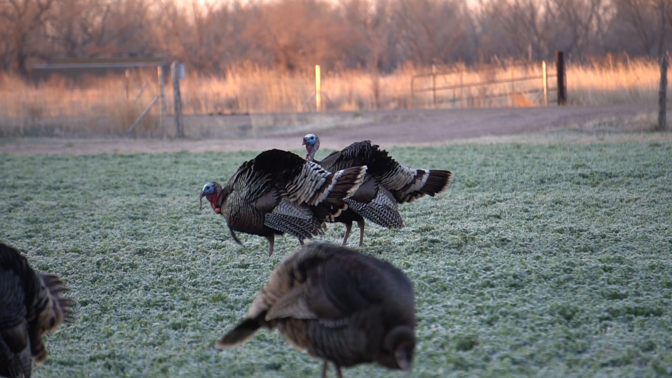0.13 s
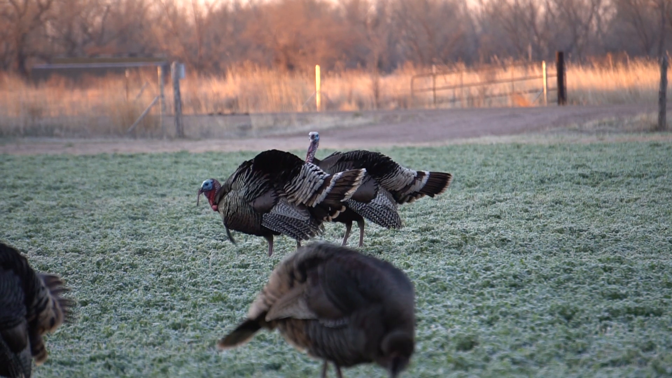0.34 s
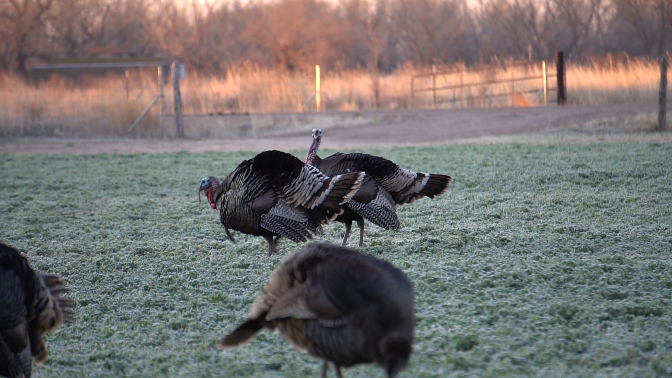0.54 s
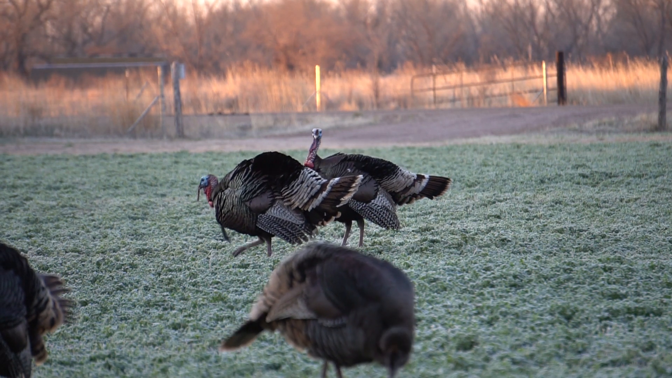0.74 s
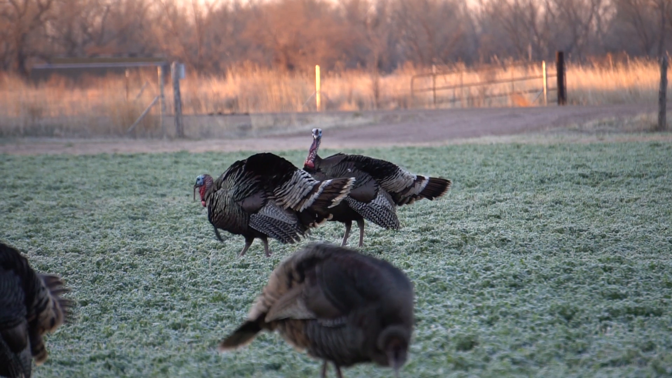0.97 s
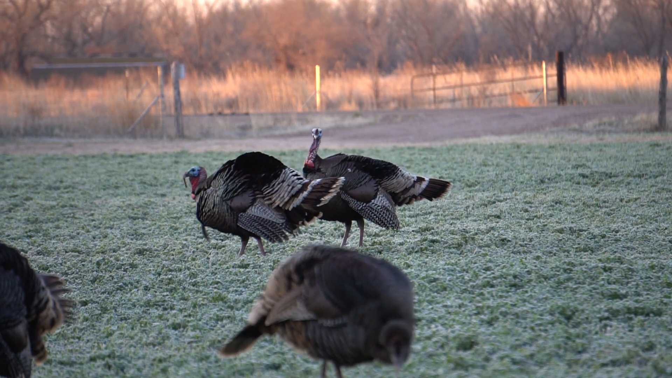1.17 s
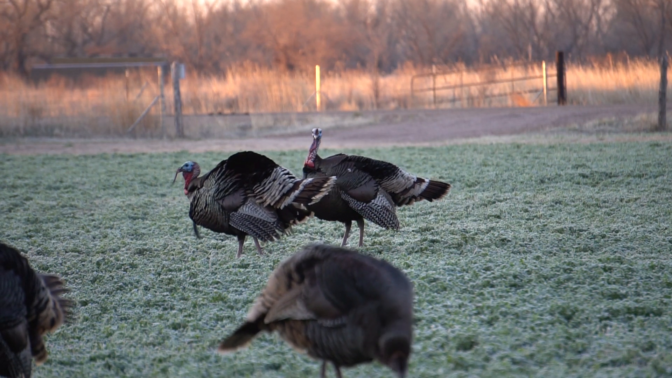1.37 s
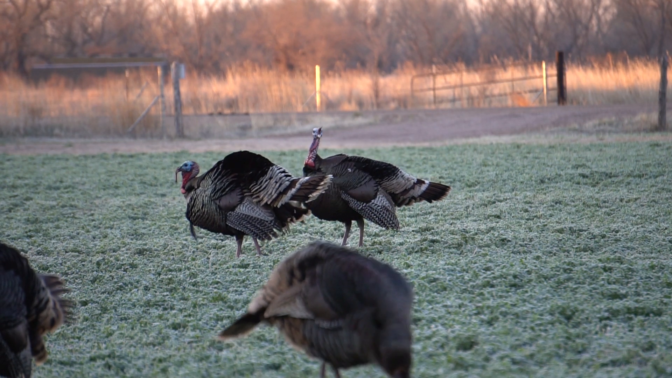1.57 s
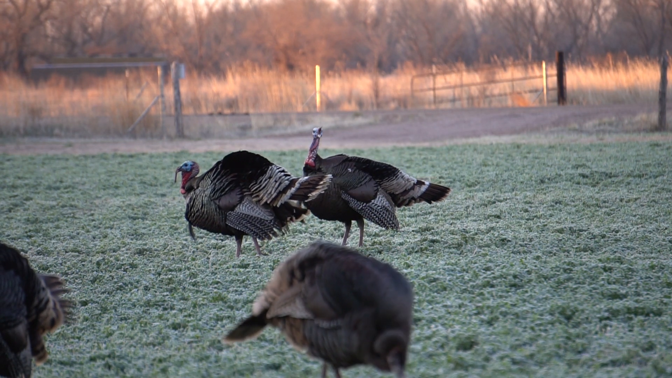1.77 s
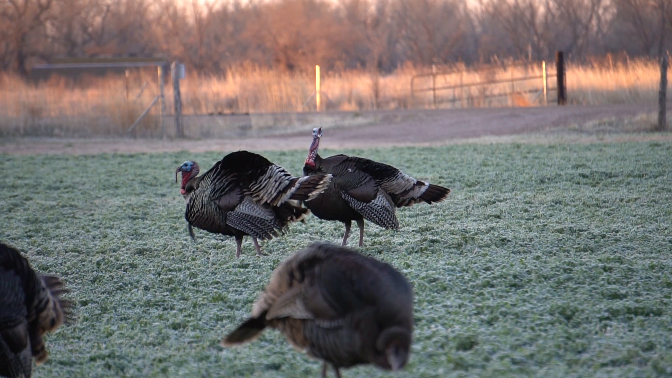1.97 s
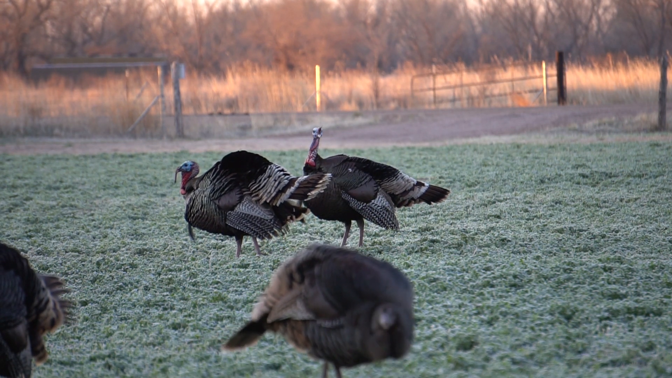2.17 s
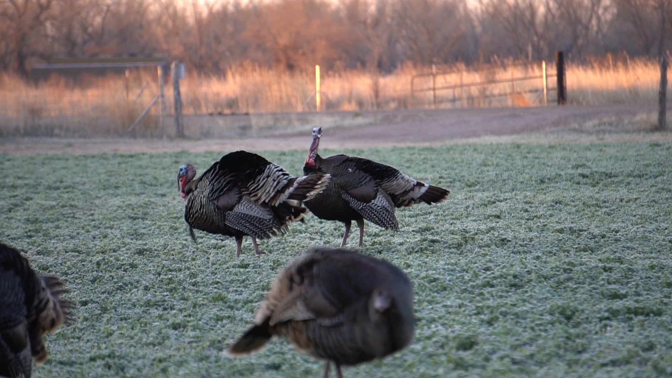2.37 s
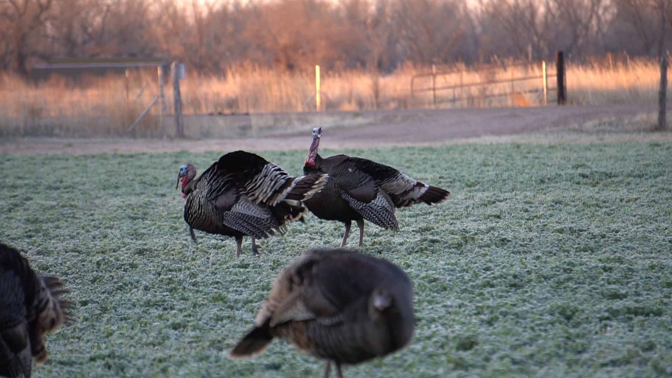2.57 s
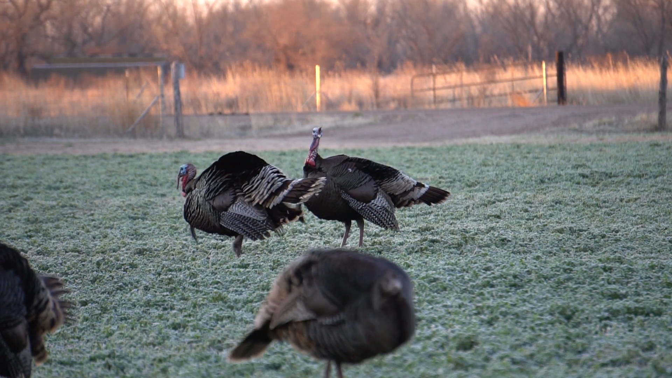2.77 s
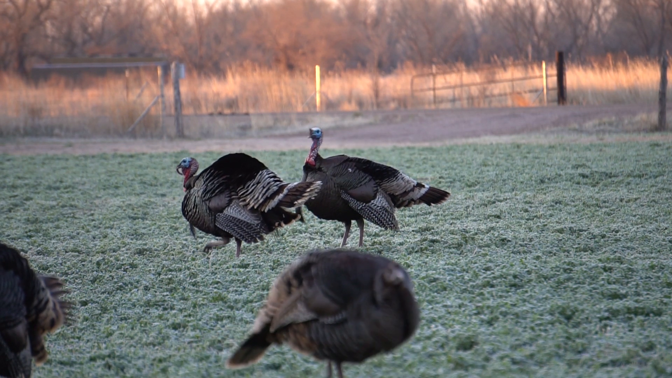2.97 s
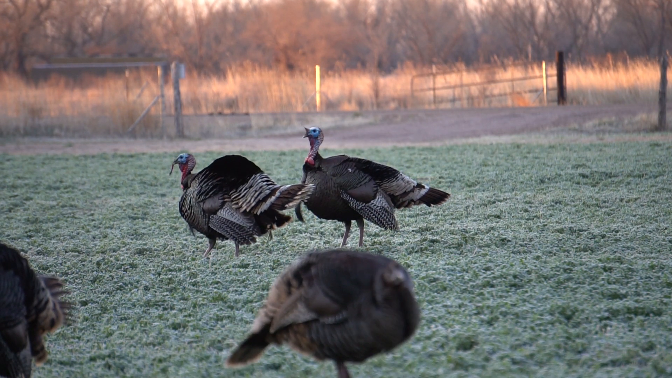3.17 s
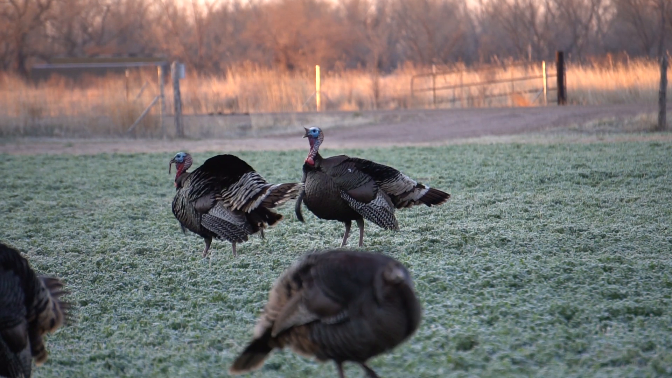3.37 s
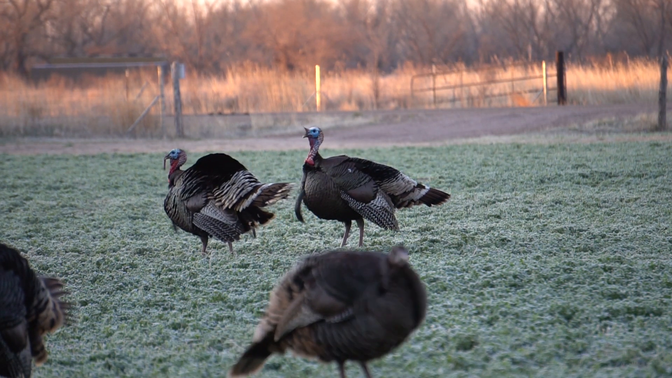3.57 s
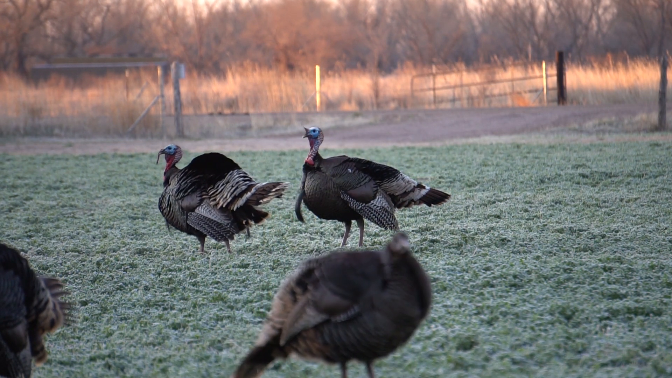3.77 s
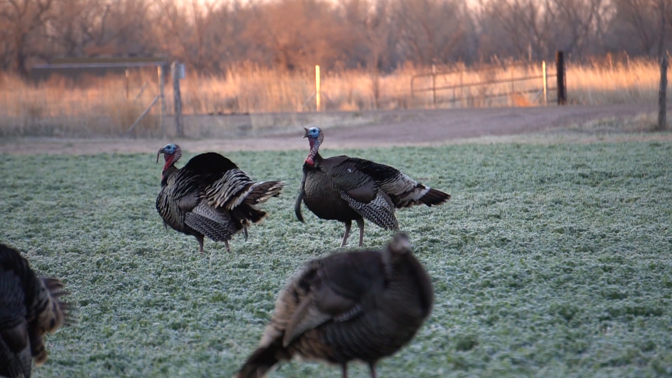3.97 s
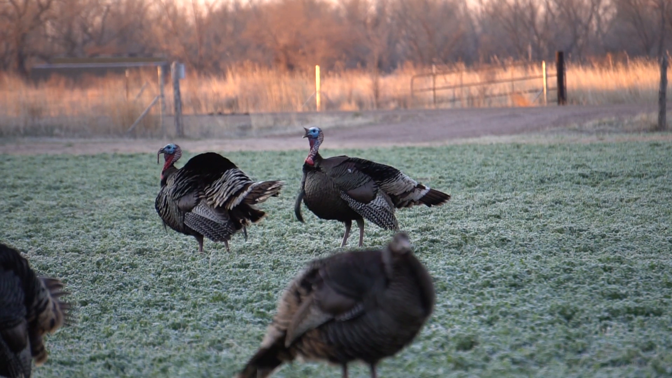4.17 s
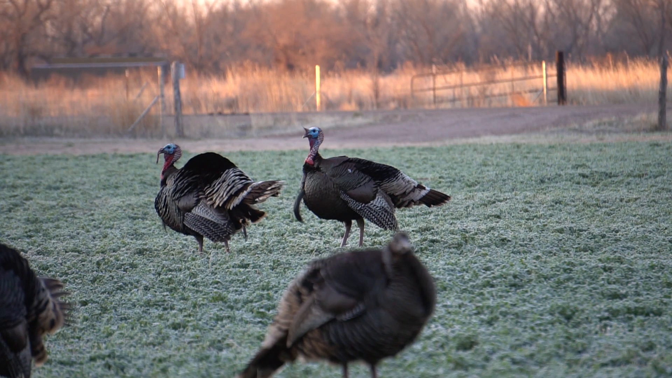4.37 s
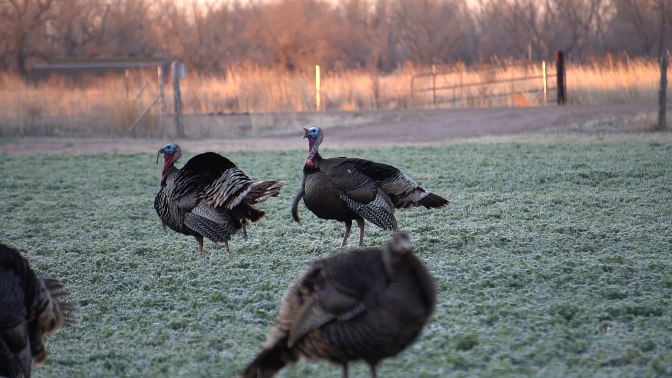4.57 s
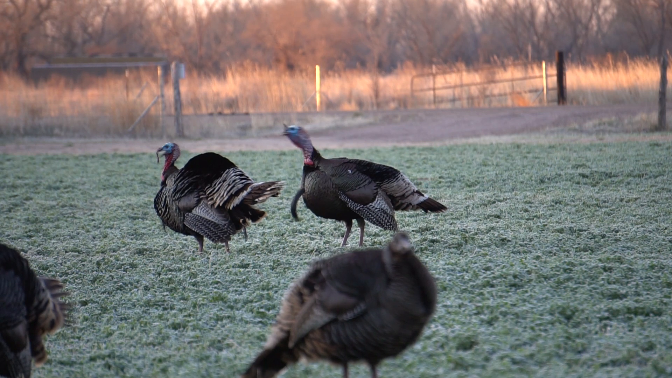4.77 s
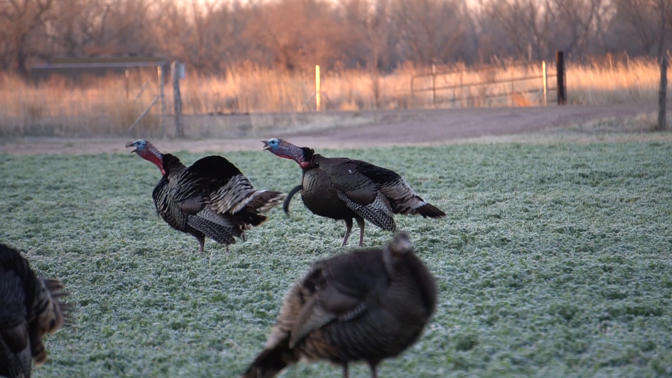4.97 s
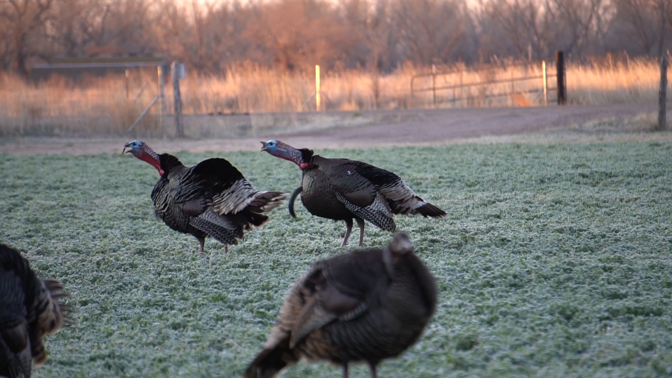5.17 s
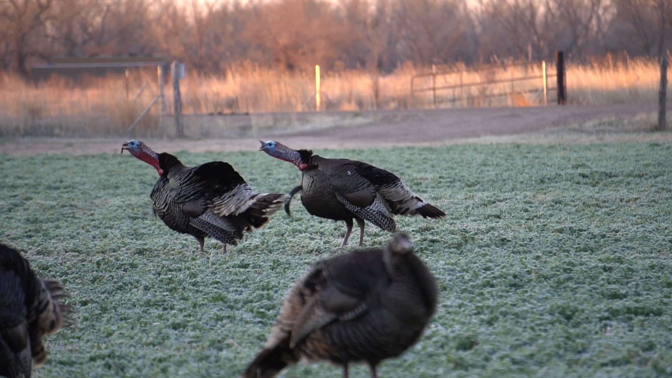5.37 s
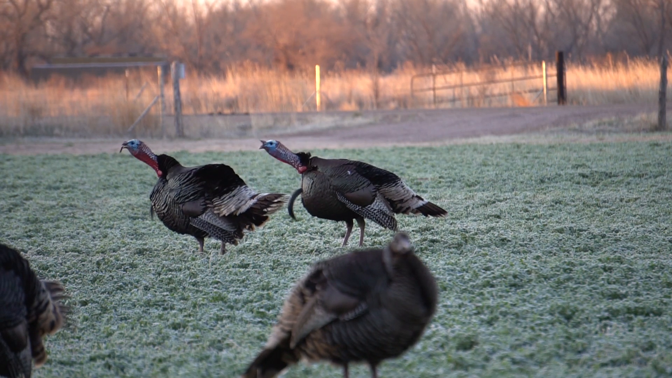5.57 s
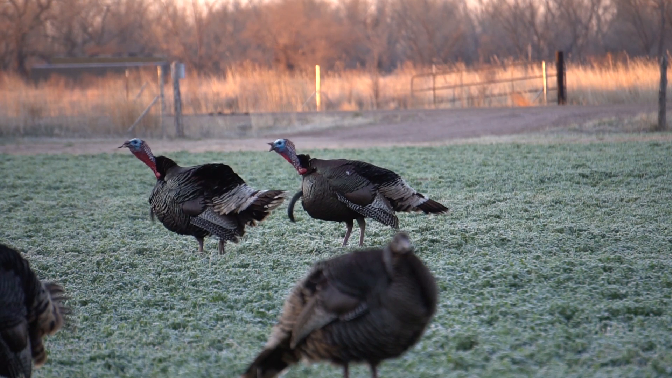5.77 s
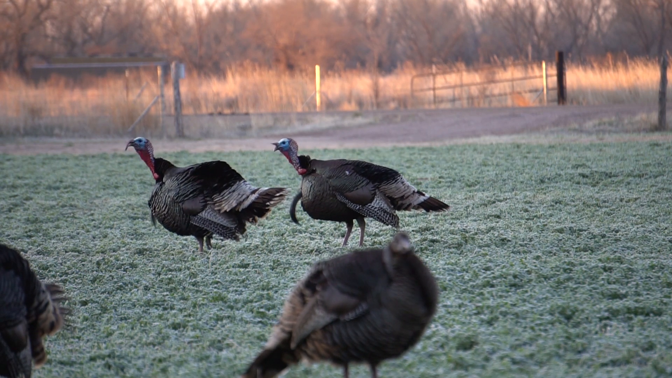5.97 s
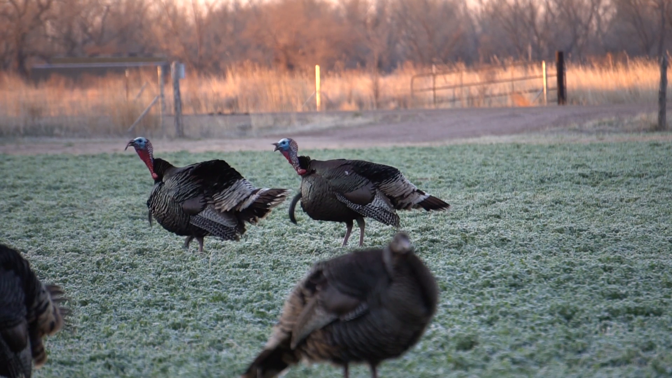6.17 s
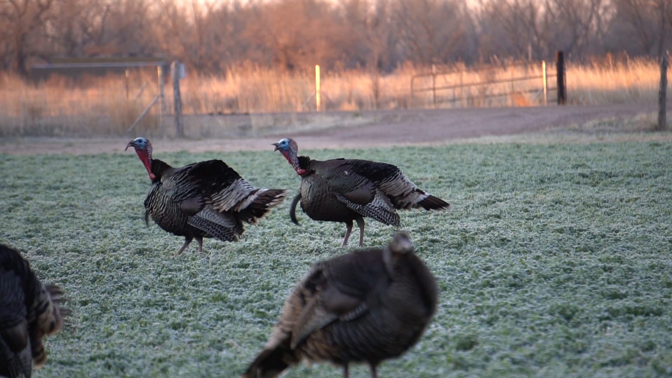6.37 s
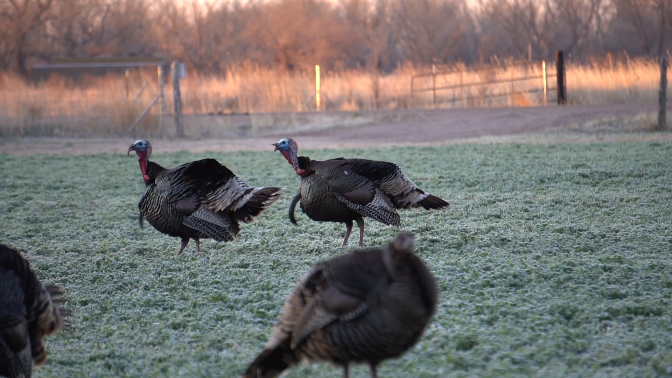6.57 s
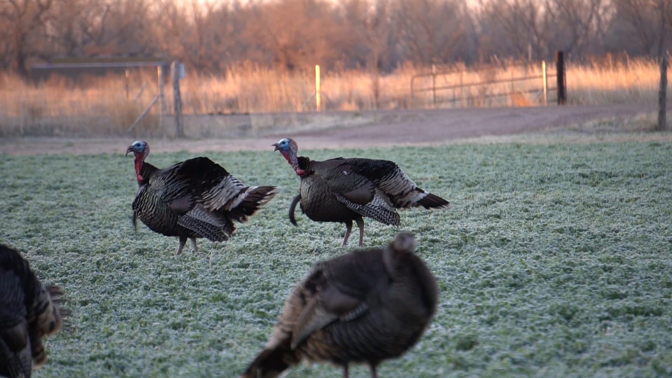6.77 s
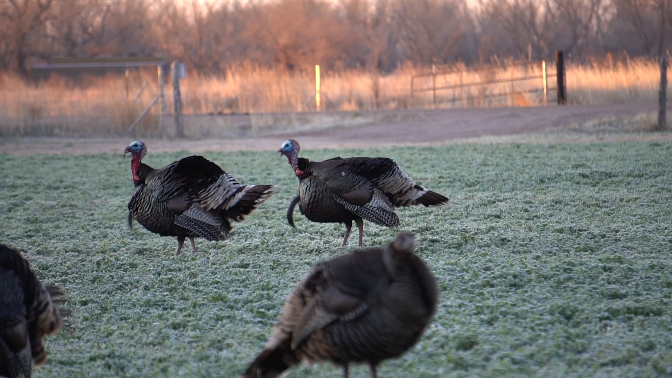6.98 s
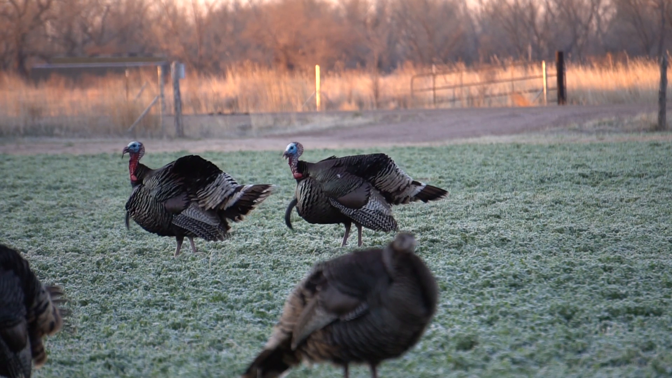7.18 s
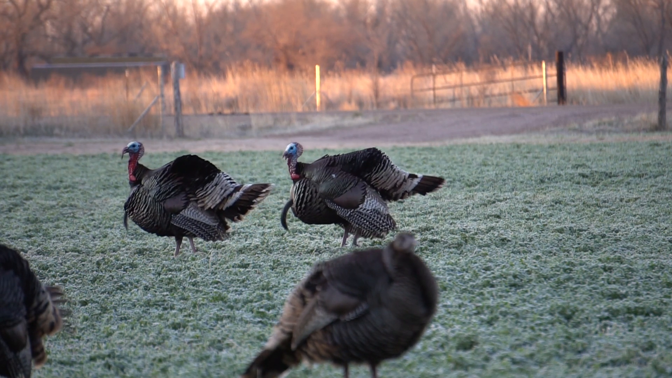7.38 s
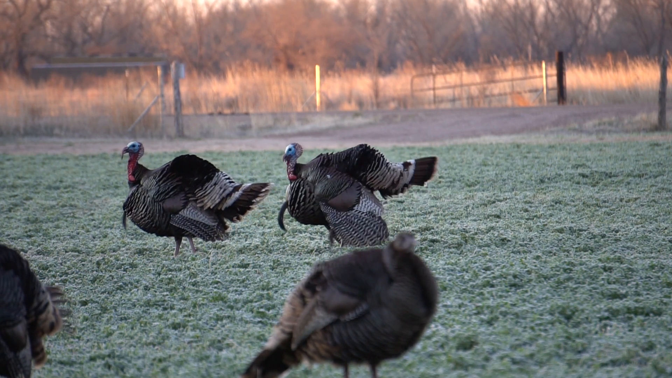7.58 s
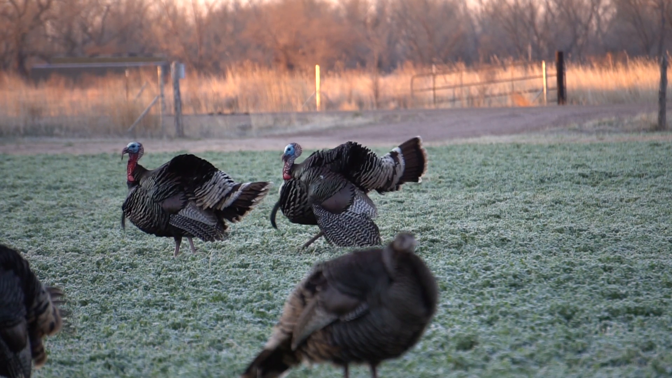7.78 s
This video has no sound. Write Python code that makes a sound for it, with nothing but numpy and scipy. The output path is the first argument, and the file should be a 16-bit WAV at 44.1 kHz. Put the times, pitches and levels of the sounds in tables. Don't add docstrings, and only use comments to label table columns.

```python
import sys
import numpy as np
from scipy import signal
from scipy.fft import rfft, irfft, next_fast_len
from scipy.io import wavfile
from scipy.ndimage import uniform_filter1d, map_coordinates

SR = 44100
rng = np.random.default_rng(int(sys.argv[2]) if len(sys.argv) > 2 else 0)


def file_out(sig):
    cols = np.atleast_2d(sig).T
    lim = np.clip(cols, -1, 1)
    pcm = np.round(lim * 32767).astype(np.int16)
    wavfile.write(sys.argv[1], SR, pcm)


def gain_from_decibels(decibels):
    exponent = np.asarray(decibels, float) / 20
    return 10 ** exponent


N = 344862
TIME = np.arange(N) / SR

# start_s, length_s, level_db, from_hz, to_hz
PURR = [(.437, 0.051, -6.5, 650.5, 669), (.49, .113, -8.5, 672, 645.4), (.606, 0.02857, -3, 633.6, 650),
        (.636, 0.052, -8.5, 689, 662), (.686, 0.023, -7, 660, 648), (.714, 0.028, -10.5, 651, 660),
        (.735, 0.056, -6, 642, 668), (.787, 0.082, -5.5, 672, 645), (.867, 0.038, -17, 693, 686),
        (.906, 0.051, -8, 667.5, 670), (.959, .028, -0.5, 663, 653), (.99, 0.0716, -6, 674.4, 668),
        (1.055, 0.081, -6, 672, 670), (1.12, 0.073, -7, 688.5, 677), (1.186, 0.029, -9, 627, 621)]
# start_s, length_s, level_db, from_hz, to_hz
CLUCKS = [
    (0.349, 0.059, -9.5, 634, 643.3),
    (1.934, 0.014, -10, 626, 617),
    (2.23, 0.018, -11.5, 631.5, 602.5),
    (2.252, 0.039, -5, 591, 598.4),
    (2.322, 0.052, -4, 616, 589.6),
    (6.81, .025, -18, 615, 672.2),
    (6.876, .068, -5, 663, 624),
    (6.955, .045, -7.5, 629.5, 623.2),
]
# start_s, length_s, level_db, from_hz, to_hz
YELPS = [
    (2.657, .09, -3, 608.5, 639.8),
    (2.978, .11, -2, 640.6, 665),
    (3.309, 0.1, -2, 661.7, 640),
    (3.635, 0.084, -2.5, 676.7, 624.7),
    (3.96, 0.092, -2.5, 704, 638),
    (4.312, .11, -3.5, 677.5, 629.4),
    (4.696, 0.0758, -3, 632.2, 599.7),
    (7.202, .075, -3, 643.7, 635),
    (7.506, .088, -2.5, 643.7, 628),
    (7.799, 0.11, -1.5, 650, 584.2),
]
# time_s, upper_partials_lift_db, hoarseness_db, third_partial_db
THROAT_STRAIN = [(.4, -11.5, -29, -9.5), (.6, -6.5, -25, -2.5), (.85, -6.5, -44, -4.5), (.89, -1.5, -6, -1),
                 (.93, -6.5, -27, -4), (1.04, -2.5, -28.5, -7), (1.09, -1, -12, -10),
                 (1.19, -4.5, -26, -13), (1.3, -2, -34, -9.5)]
# multiple, level_db
HEN_PARTIALS = [(1, -35.5), (4, -21), (5, -27.5), (6, -37.5), (7, -36), (8, -44), (9, -52), (10, -56.5),
                (11, -58.5)]
REST_HZ, LIFT_DB_PER_HZ, THIRD_DB_PER_HZ = 650, 0.3064, 0.0341
BURST_S, BURST_DB, BURST_RASP_DB, BURST_HZ = .017, 1.5, 6, 40
SPLIT, SPLIT_DB = .05, -9


def hen():
    start, length, _, from_hz, to_hz = np.transpose(sorted(PURR + CLUCKS + YELPS))
    tension_hz = uniform_filter1d(glide(start, length, from_hz, to_hz), size=400)
    lift_db, hoarse_db, third_db = curves(THROAT_STRAIN)
    lift_db = lift_db + LIFT_DB_PER_HZ * (tension_hz - REST_HZ)
    third_db = third_db + THIRD_DB_PER_HZ * (tension_hz - REST_HZ)

    since = TIME - np.transpose(YELPS)[0][:, None]
    burst = np.sum((since > 0) * np.exp(-(since / BURST_S) ** 2), axis=0)
    yelping = np.any((since > 0) & (since < .15), axis=0)
    least_hoarse_db = -30 + 10 * (TIME > THROAT_STRAIN[-1][0])
    hoarse_db = np.clip(hoarse_db, least_hoarse_db, -13) + BURST_RASP_DB * burst

    pitch = (tension_hz + BURST_HZ * burst) * (1 + .012 * wobble(40) + .01 * wobble(300))
    phase = cycles(pitch)
    second_partial = gain_from_decibels(1.5 * wobble(130)) * np.sin(2 * phase)
    third_partial = gain_from_decibels(third_db + 3 * wobble(100)) * np.sin(3 * phase + 1.8)
    slipped = cycles(pitch * (1 - SPLIT * (1 + .3 * wobble(45))))
    side = gain_from_decibels(3 * wobble(70)) * np.sin(2 * slipped)
    side += gain_from_decibels(third_db + 3 + 3 * wobble(70)) * np.sin(3 * slipped)
    strong = second_partial + third_partial + gain_from_decibels(SPLIT_DB) * yelping * (1 - burst) * side

    upper = np.zeros(N)
    for multiple, db in HEN_PARTIALS:
        level_db = db + lift_db * min(multiple, 7) / 6 + 4 * wobble(90)
        upper += gain_from_decibels(level_db) * np.sin(multiple * (phase + .085 * wobble(300)))

    colour = [(600, -120), (800, -10), (1350, 0), (2000, -5), (2700, -14), (4500, -24), (6500, -44), (12000, -75)]
    breath = gain_from_decibels(hoarse_db + 0.73 * wobble(48)) * noise(colour)

    throbs = notes(PURR, attack_s=.011, fade_db=2, release_s=.008, depth=.16)
    throbs += notes(CLUCKS, attack_s=.016, fade_db=9, release_s=.012, depth=.35)
    throbs += gain_from_decibels(BURST_DB * burst) * notes(YELPS, attack_s=.003, fade_db=10, release_s=.02, depth=.45)
    steady = uniform_filter1d(throbs, size=500, origin=249)
    return echoes(throbs * (strong + breath) + steady * upper, t60=.16, wet_db=-14)


def tom(pitch, hoarse):
    phase = cycles(pitch * (1 + .02 * wobble(60) + .014 * wobble(300)))
    pulses = unit(sum(gain_from_decibels(4 * wobble(70)) * np.cos(k * phase + k * k) for k in range(1, 17)))
    pulses *= 1 + 0.081 * np.cos(phase / 2)
    rasp = unit(rng.standard_normal(N) * (1 + np.cos(phase)))
    rattle = gain_from_decibels(3 * wobble(140))
    return rattle * (np.sqrt(1 - hoarse) * pulses + np.sqrt(hoarse) * rasp)


# start_s, length_s, level_db, first_tom_pitch_hz, hoarseness (0-1)
SYLLABLES = [(4.8, 0.053, -7, 578.3, 0.1), (4.869, .03, -3.5, 638, 0.3), (4.891, 0.0315, 2, 670, 0.7),
             (4.92, 0.0266, -2.5, 598, 0.5), (4.949, 0.023, -0.5, 680, .05),
             (4.972, 0.031, -1.5, 636.5, .3), (5.026, 0.043, -3.5, 622.2, 0.3),
             (5.065, 0.045, -5.5, 606.4, 0.4), (5.099, .05, -5.5, 706.4, 0.2),
             (5.148, 0.069, -7, 685.4, 0.1), (5.231, 0.068, -7, 586.5, 0.1), (5.298, .055, -7, 688.7, 0),
             (5.351, 0.084, -9.5, 680, .06), (5.434, 0.059, -6.5, 595.3, 0.39),
             (5.491, 0.038, -14.5, 657, 0), (5.523, .022, -11.5, 612.5, 0),
             (5.544, 0.041, -11.5, 672.2, 0.1), (5.609, 0.047, -15.5, 502, 0.4),
             (5.656, 0.041, -18, 554.5, 0.3), (5.717, 0.061, -19, 558.5, 0.3),
             (5.779, 0.028, -22.5, 603.2, 0)]
# time_s, mouth_opening (0-1), second_tom_db, chest_boom_db
NECK = [(4.8, 0, -19, -37), (4.9, 0.54, -15, -34), (5.05, .75, -5, -31.5), (5.25, 0.78, -2, -34.5),
        (5.37, 0.75, 1.5, -35.5), (5.5, 0.73, -6.5, -34.5), (5.68, .6, 2, -30.5), (5.77, 0.8, -3.5, -37),
        (5.85, 0.4, -7.5, -40)]
# centre_hz, width_hz, level_db
SHUT = [(680, 33, -4), (1070, 520, -1.5), (1720, 500, 4), (2460, 430, -14.5)]
# centre_hz, width_hz, level_db
BEAK = [(1350, 5700, 1)]
# centre_hz, width_hz, level_db
OPEN = [(680, 150, -12), (1050, 220, -3), (1800, 280, -5), (2950, 450, 8), (4400, 900, -14),
        (9500, 1500, -36)]
# frequency_hz, level_db
GOBBLE_COLOUR = [(20, 1.5), (5000, -4), (7200, -25), (9500, -18), (20000, -4)]
SECOND_PITCH, SECOND_SPREAD, SCOOP = .84, .05, .04
LAG_S = .006


def toms():
    mouth, second_db, boom_db = curves(NECK)
    start, length, _, first_hz, hoarse = np.transpose(SYLLABLES)
    mouth = np.clip(mouth, 0, 1) * (TIME > start[1])
    hoarse = np.clip(glide(start, length, hoarse, hoarse), .05, .55)
    second_hz = SECOND_PITCH * first_hz.mean() * (1 + SECOND_SPREAD * rng.standard_normal(len(start)))
    first = tom(glide(start, length / 2, first_hz * (1 - SCOOP), first_hz), hoarse)
    second = tom(glide(start, length / 2, second_hz * (1 - SCOOP), second_hz), hoarse)

    syllables = notes(SYLLABLES, attack_s=.014, fade_db=2, release_s=.01, depth=.2)
    trailing = np.roll(syllables, round(LAG_S * SR))
    source = syllables * first + gain_from_decibels(second_db) * trailing * second
    source /= np.sqrt(1 + gain_from_decibels(second_db) ** 2)
    opened = unit(throat(source, OPEN))
    closed = unit(throat(throat(source, SHUT), BEAK))
    voice = (mouth * opened + (1 - mouth) * closed) * np.std(source)
    voice = filtered(voice, lambda f: gain_from_decibels(np.interp(f, *np.transpose(GOBBLE_COLOUR))))

    sounding = (TIME > NECK[0][0]) & (TIME < NECK[-1][0])
    boom = gain_from_decibels(boom_db) * sounding * noise([(30, -120), (45, 5.5), (70, 4.0), (100, 2.5), (140, -120)])
    return echoes(gain_from_decibels(-5) * voice, t60=.2, wet_db=-15) + boom


def whistle(rows):
    out = np.zeros(N + SR)
    for start, length, from_hz, to_hz, db in rows:
        count = round(length * SR)
        u = np.arange(count) / count
        arch = np.sin(np.pi * u)
        hz = from_hz + (to_hz - from_hz) * u + 80 * arch
        out[round(start * SR):][:count] += gain_from_decibels(db + 2.5) * arch * np.sin(cycles(hz))
    return out[:N]


# start_s, length_s, from_hz, to_hz, level_db
WHISTLES = [(.01, 0.073, 2774, 3080, -39), (.195, 0.026, 2950, 3080, -37.5), (.2, 0.018, 1360, 1415, -38),
            (1.31, 0.061, 3010, 2940, -44), (1.43, 0.093, 2630, 2850, -42.5),
            (1.77, 0.056, 3020, 2898, -43), (1.85, 0.31, 2647, 2490, -51.5), (1.84, .1, 2235, 2405, -43.5),
            (2.04, 0.03, 3114, 3117, -39.5), (2.05, 0.087, 2410, 2270, -44), (2.06, 0.034, 4726, 4643, -49),
            (2.11, 0.044, 2890, 2800, -40.5), (2.5, 0.17, 2560, 2540, -52.5),
            (3.25, 0.07, 2476, 2730, -37.5), (3.54, 0.028, 2150, 2420, -44), (3.86, 0.1, 3600, 2354, -40),
            (4.15, 0.084, 2685, 2926, -43.5), (4.58, 0.057, 3250, 3210, -45),
            (6.33, 0.037, 2340, 2710, -57), (6.44, 0.0606, 2100, 2530, -46.5),
            (6.47, 0.12, 2900, 3160, -51), (6.67, .07, 2645, 2410, -39.5), (7.38, 0.028, 2860, 3240, -49),
            (7.75, 0.018, 2290, 2240, -41)]
# start_s, length_s, centre_hz, level_db
CHIPS = [
    (5.918, 0.014, 4080, -50),
    (6.09, 0.022, 4100, -56),
    (6.235, 0.036, 4160, -48),
    (6.392, .04, 4300, -52),
    (6.438, 0.028, 4600, -57),
    (6.44, .025, 6860, -58),
    (6.546, 0.044, 4170, -52),
    (6.724, 0.033, 4030, -51),
    (6.788, .02, 4300, -55),
]
# frequency_hz, level_db per Hz
TREES = [(1500, -120), (1900, 4), (2600, 10.5), (3300, 5), (4200, -2.5), (5500, -17.5), (7000, -120)]
# time_s, chorus_db, field_db
FIELD = [(0.0, -49.5, -34), (0.54, -51.5, -35.5), (4.64, -49.5, -35.5), (5.01, -47.5, -36.5),
         (7.82, -52, -35)]


def songbirds(count=330):
    place, length, height, slide, size = rng.random((count, 5)).T
    hz = 2000 + 1200 * height
    far_notes = [place * N / SR, .02 + .06 * length, hz, hz + 1400 * (slide - .5), -14 * size]
    far = whistle(np.transpose(far_notes))
    chorus = unit(echoes(far, t60=0.2, wet_db=1.5)) + gain_from_decibels(-3 + 2.5 * wobble(7)) * noise(TREES)
    chips = np.zeros(N)
    for start, length, hz, db in CHIPS:
        band = noise([(hz - 1100, -60), (hz - 500, -6), (hz, 0), (hz + 700, -8), (hz + 1400, -60), (20000, -120)])
        chips += gain_from_decibels(db - 11 * ((TIME - start - length / 2) / (length / 2)) ** 2) * band
    return gain_from_decibels(curves(FIELD)[0]) * chorus + echoes(whistle(WHISTLES), t60=.25, wet_db=-9) + chips


# frequency_hz, level_db per Hz
TRAFFIC = [(12, -23.5), (20, -9.5), (43, 8), (97, -6.5), (204, -1), (383, -14.5), (551, -4.5), (594, -2),
           (1010, -8), (1460, -21), (1900, -44), (2470, -54), (4180, -120)]
# frequency_hz, level_db per Hz
HUM = [(560, -120), (580, 0.5), (588, 11.5), (596, -4), (620, -120)]
# frequency_hz, level_db per Hz
HISS = [(1000, -120), (1500, 9.5), (6000, -6.5), (11000, -7.5), (20000, -18.5)]


def field():
    swell_db = curves(FIELD)[1] + 2.5 + .8 * wobble(4.13) + 1.2 * wobble(12)
    return gain_from_decibels(swell_db) * noise(TRAFFIC) + gain_from_decibels(-49.5) * noise(HUM) + gain_from_decibels(-56.5) * noise(HISS)


THROB_HZ = 41.54
THROB_GROWS_S = .014


def notes(rows, attack_s, fade_db, release_s, depth):
    energy = np.zeros(N)
    for (start, length, db, *_), chance in zip(rows, rng.standard_normal((len(rows), 2))):
        span = slice(round(start * SR), round((start + length + .1) * SR))
        t = TIME[span] - start
        rise = np.sin(np.pi / 2 * np.clip(t / attack_s, 0, 1)) ** 2
        fall_db = fade_db * t / length + 10 * (np.maximum(t - length + release_s, 0) / release_s) ** 2
        turns = THROB_HZ * t * (1 + .2 * chance[0]) - .3 + .12 * chance[1]
        grown = 1 - np.exp(-(t / THROB_GROWS_S) ** 2)
        throb = np.abs(1 + depth * grown * np.exp(2j * np.pi * turns))
        energy[span] += (rise * throb * gain_from_decibels(db - fall_db)) ** 2
    return np.sqrt(energy)


def glide(start, length, first, last):
    times = np.maximum.accumulate(np.ravel([start, start + length], order="F"))
    return np.interp(TIME, times, np.ravel([first, last], order="F"))


def curves(rows):
    times, *columns = np.transpose(rows)
    return [np.interp(TIME, times, column) for column in columns]


def cycles(hz):
    return 2 * np.pi * np.cumsum(hz) / SR


def wobble(rate):
    return map_coordinates(rng.standard_normal(int(N * rate / SR) + 4), [TIME * rate])


def unit(x):
    return x / np.sqrt(np.mean(x ** 2) + 1e-20)


def filtered(x, response):
    m = next_fast_len(N + SR // 2)
    return irfft(rfft(x, m) * response(np.fft.rfftfreq(m, 1 / SR)), m)[:N]


def noise(spectrum):
    hz, db = np.transpose(spectrum)
    return unit(filtered(rng.standard_normal(N), lambda f: gain_from_decibels(np.interp(np.log(f + 1), np.log(hz), db))))


def throat(x, modes):
    def response(f):
        total = 0
        for k, (centre, width, db) in enumerate(modes):
            damping = 1j * f * width
            total = total + (-1) ** k * gain_from_decibels(db) * damping / (centre * centre - f * f + damping)
        return total
    return filtered(x, response)


def echoes(x, t60, wet_db):
    t = np.arange(SR // 3) / SR
    tail = rng.standard_normal(len(t)) * gain_from_decibels(-60 * t / t60) * (t > .004)
    return x + gain_from_decibels(wet_db) * signal.fftconvolve(x, tail / np.linalg.norm(tail))[:N]


def limiter_gain(loud, knee_db, slope, most_db, lag_s):
    keep = np.exp(-1 / (lag_s * SR))
    level_db = 10 * np.log10(signal.lfilter([1 - keep], [1, -keep], loud ** 2) + 1e-12)
    return gain_from_decibels(-np.clip(slope * (level_db - knee_db), 0, most_db))


def scene():
    near = hen()
    birds = near + toms()
    birds = birds * limiter_gain(birds, knee_db=-10.5, slope=1, most_db=10, lag_s=.015)
    gain = limiter_gain(near, knee_db=-12, slope=4, most_db=14.5, lag_s=0.02)
    return (birds + gain * (songbirds() + field()))[None]


def low_pass(x):
    return signal.sosfilt(signal.butter(12, 11050, fs=SR, output="sos"), x)


def record(dry):
    mix = np.clip(dry, -1, 1)
    return low_pass(mix)


dry = scene()
out = record(dry)
file_out(out)
```